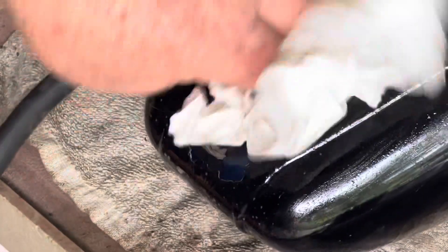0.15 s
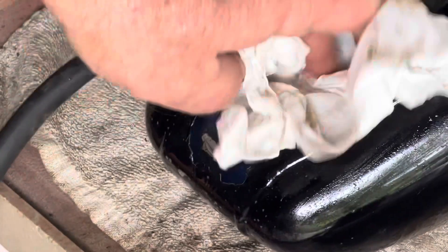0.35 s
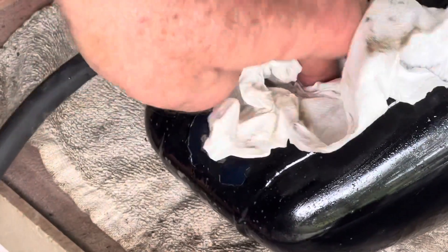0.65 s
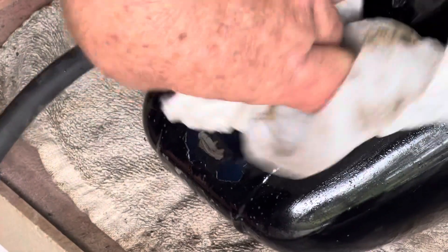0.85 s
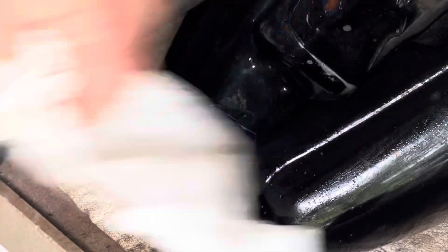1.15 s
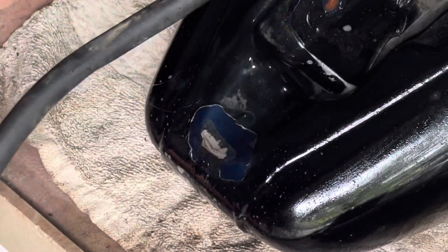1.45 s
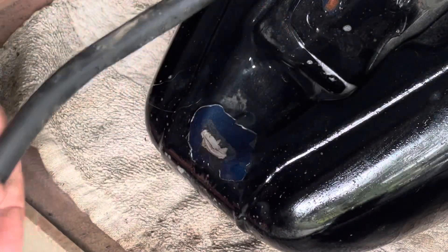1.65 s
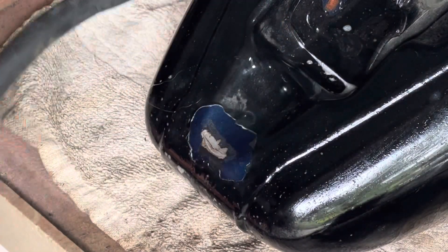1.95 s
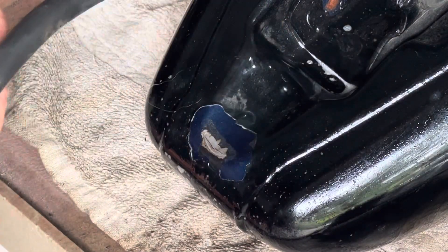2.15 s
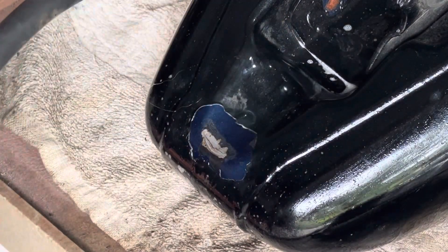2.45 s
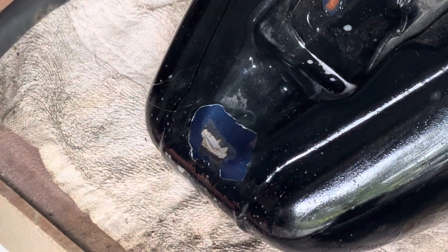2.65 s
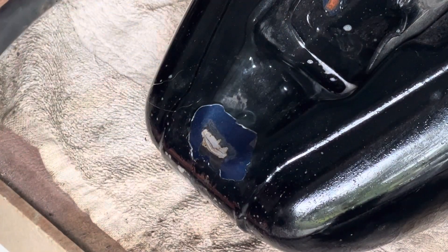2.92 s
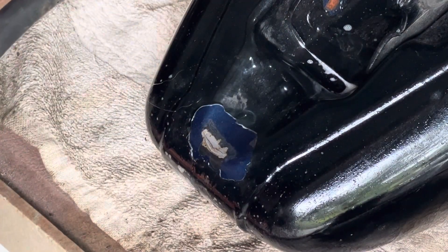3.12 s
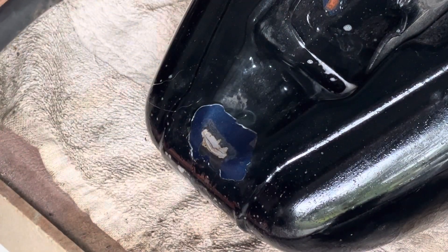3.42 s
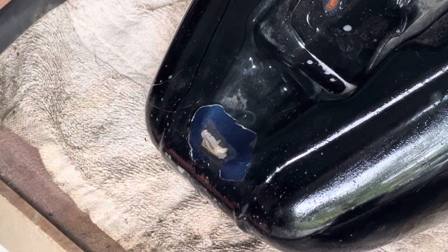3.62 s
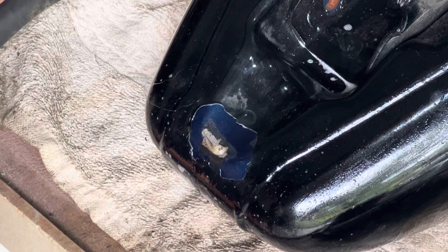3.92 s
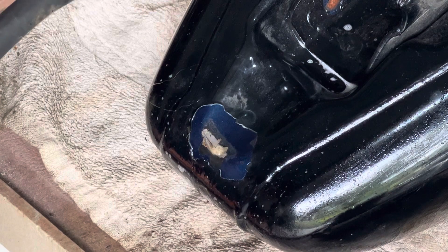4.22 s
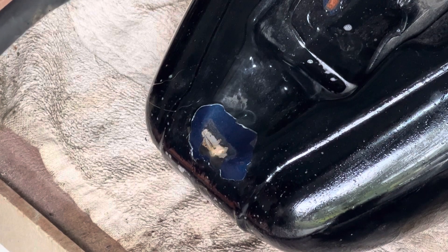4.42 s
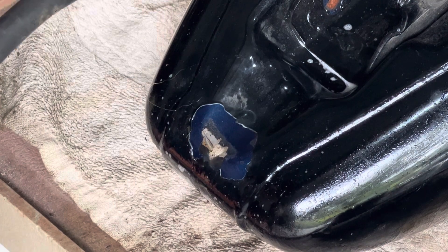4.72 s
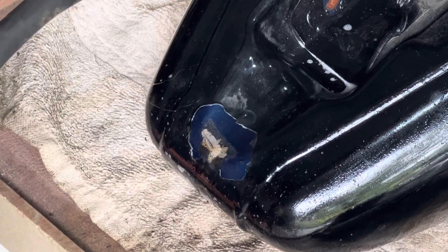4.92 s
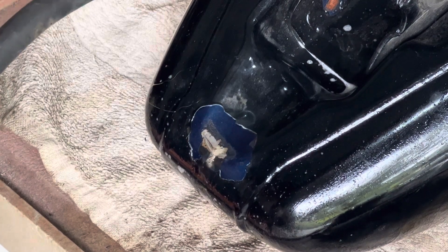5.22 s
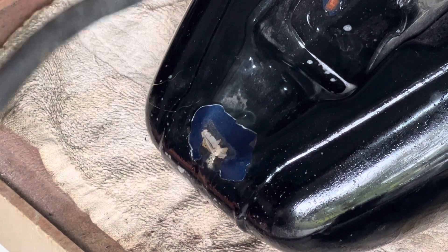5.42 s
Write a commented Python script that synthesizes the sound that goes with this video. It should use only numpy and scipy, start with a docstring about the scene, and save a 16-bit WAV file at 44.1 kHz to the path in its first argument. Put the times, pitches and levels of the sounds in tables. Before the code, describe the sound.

In a reverberant workshop, a thin air leak hisses steadily over low rumble. Close by, a paper towel rustles and a hand bumps and drags on a hollow metal tank for about a second and a half. After a quiet wait, three short, very loud air gun blasts roar into the tank, each fading into the room. A hose knocks at the very end. Close phone pickup in stereo.

```python
"""First a leaking air line hisses over workshop rumble, as a paper towel rubs a metal tank and a hand bumps it.
Then three air gun blasts roar into the tank and die away in the workshop; at the end the hose knocks.
Air is filtered noise, blows are short forces ringing damped modes, and the room is decaying noise.
Place: a workshop. Distance: close by, sources in the centre. Microphone: a phone with two ports."""
import sys
import numpy as np
from scipy import signal
from scipy.fft import rfft, irfft
from scipy.io import wavfile

SR = 44100
rng = np.random.default_rng(int(sys.argv[2]) if len(sys.argv) > 2 else 0)


def waveform_to_disk(signal):
    """Save audio, clipped to [-1, 1], as 16-bit WAV at the path in sys.argv[1]."""
    frames = np.transpose(np.atleast_2d(signal))
    scaled = np.clip(frames, -1, 1) * 32767
    samples = np.round(scaled).astype(np.int16)
    wavfile.write(sys.argv[1], SR, samples)


N = 245634  # samples
TIME = np.arange(N) / SR  # s
FREQ = np.maximum(np.arange(N // 2 + 1) * SR / N, 1)  # Hz


def undb(db):
    """Decibels to amplitude gain."""
    return 10 ** (np.asarray(db) / 20)


def gains(spectrum):
    """Gain at every frequency, drawn through (f/Hz, level/dB) points on a log frequency axis."""
    hz, db = np.transpose(spectrum)
    return undb(np.interp(np.log(FREQ), np.log(hz), db))


def shape(x, response):
    """Filter by a frequency response."""
    return irfft(rfft(x) * response, N)


def noise(spectrum):
    """Random noise with the given power per Hz."""
    return shape(rng.standard_normal(N), gains(spectrum)) * np.sqrt(SR / 2)


def walk(rate_hz):
    """Smooth random curve with mean 0 and spread 1; a higher rate wanders faster."""
    curve = shape(rng.standard_normal(N), np.exp(-(FREQ / rate_hz) ** 2))
    return (curve - curve.mean()) / curve.std()


def split(x, centres):
    """Overlapping bands that add up to the whole."""
    log_centres = np.log(centres)
    return [shape(x, np.interp(np.log(FREQ), log_centres, pick)) for pick in np.eye(len(centres))]


def turbulent(x, depth_db, rate_hz):
    """Eddies make the bands flicker, partly together and partly alone."""
    shared = walk(rate_hz)
    total = 0
    for band in split(x, np.geomspace(400, 12000, num=6)):
        flicker = walk(rate_hz) + shared / 2
        total = total + band * undb(depth_db * flicker)
    return total


def resonance(hz, width_hz):
    """Band-pass response of one resonance, with gain 1 at the centre."""
    return 1 / (1 + 1j * (FREQ / hz - hz / FREQ) * hz / width_hz)


def narrow_noise(hz, width_hz):
    """Noise through one resonance applied twice for steeper sides, rms 1."""
    x = shape(rng.standard_normal(N), resonance(hz, width_hz) ** 2)
    return x / x.std()


# air line leak, colour of the hiss before its level is set: f/Hz, level/dB per Hz
LEAK_COLOUR = [(500, -120), (1400, -116), (1900, -109), (2500, -100), (4000, -93), (5000, -92), (5800, -88),
               (7400, -93.5), (8200, -99), (8900, -102), (9800, -119), (12000, -120), (15000, -137)]
# the leak swells and sinks in a slow, even cycle
LEAK_DB, SWELL_DB, SWELL_PERIOD_S, SWELL_CREST_S = -55, 1.14, 1.204, 0.73


def leak():
    """Air escaping through a small gap: a thin, steady hiss that slowly swells and sinks."""
    swell = SWELL_DB * np.cos(2 * np.pi * (TIME - SWELL_CREST_S) / SWELL_PERIOD_S)
    hiss = turbulent(noise(LEAK_COLOUR), depth_db=0.5, rate_hz=13)
    return hiss / hiss.std() * undb(LEAK_DB + swell)


# workshop rumble, before its wander: f/Hz, level/dB per Hz
RUMBLE_COLOUR = [(20, -104), (40, -106), (60, -87.5), (100, -92), (180, -93.5), (300, -100.5), (600, -105),
                 (1300, -115), (3000, -130)]


def workshop_rumble():
    """Low, broad noise of the place, whose level wanders slowly."""
    return noise(RUMBLE_COLOUR) * undb(1.3 * walk(rate_hz=2.4))


# workshop reverberation: f/Hz, t60/s, level/dB
WORKSHOP_DECAY = [(100, 1.04, -5), (300, 0.85, -9), (742, 1.16, -11.5), (1495, 0.78, -8), (2470, 0.74, -10),
                  (4940, 0.78, -8.5), (7260, 0.73, -4), (11300, 0.6, -6), (16000, 0.41, -8)]


def room_tail(x, build_s=0.0082):
    """Dense reflections that build up quickly and die sooner in the high treble."""
    bands = split(rng.standard_normal(N), [row[0] for row in WORKSHOP_DECAY])
    response = 0
    for band, (_, t60, db) in zip(bands, WORKSHOP_DECAY):
        decay = np.log(1000) / t60
        # the root evens out the energy of short and long tails
        response = response + band * np.exp(-decay * TIME) * undb(db) * np.sqrt(2 * decay / SR)
    return signal.fftconvolve(x, response * (1 - np.exp(-TIME / build_s)))[:N]


# paper rubbing on metal, before stroke and crinkle: f/Hz, level/dB per Hz
PAPER_COLOUR = [(150, -102), (500, -99), (1300, -103), (3000, -102), (6000, -102), (10000, -117),
                (16000, -117)]
# paper towel strokes: centre t/s, half length t/s, level/dB
TOWEL_STROKES = [(0.2, 0.1, -0.5), (0.873, 0.06, -14), (1.21, 0.015, -5), (1.385, 0.051, -3)]
# the towel rustles faintly until it is lifted away
RUSTLE_DB, LIFTED_S, LIFT_S = -9.5, 1.42, 0.062


def towel(crinkle_db=3.0):
    """Soft paper rustles while it is held, and rubs with each stroke; fast level wander is the crinkle."""
    held = undb(RUSTLE_DB) * (1 - np.tanh((TIME - LIFTED_S) / LIFT_S)) / 2
    strokes = 0
    for centre, half, db in TOWEL_STROKES:
        strokes = strokes + undb(db) * np.exp(-((TIME - centre) / half) ** 2 / 2)
    return noise(PAPER_COLOUR) * (held + strokes) * undb(crinkle_db * walk(rate_hz=200))


def struck(blows, modes, scuff_s, thud_hz, thud_db, thud_t60, spot_db=2.5, choke_s=0.008):
    """Each blow is a short push and a fading scuff; softer contact rings mainly the low modes."""
    ring, dull, age = np.zeros(N + SR), np.zeros(N + SR), TIME[:SR // 2]
    hz, mode_db, t60 = np.transpose(modes)
    tones = np.cos(2 * np.pi * hz[:, None] * age)
    # crowded, well damped modes merge into a thud
    crowd = shape(rng.standard_normal(N), resonance(thud_hz, 2.2 * thud_hz) ** 2)
    thud = undb(thud_db) * np.exp(-np.log(1000) * age / thud_t60) / crowd.std()
    for start, db, contact_ms, scuff_db, free in sorted(blows):
        first = int(start * SR)
        span = slice(first, first + len(age))
        # whatever stays in contact damps its own ring and chokes the earlier ones
        rings = tones * np.exp(-np.log(1000) * age / (free * t60[:, None]))
        ring[span] *= free + (1 - free) * np.exp(-age / choke_s)
        # the push peaks a quarter of the contact time in
        push = age * np.exp(-age / (contact_ms / 4000))
        scuff = rng.standard_normal(len(age)) * np.exp(-age / scuff_s)
        force = undb(db) * (push / push.sum() + undb(scuff_db) * scuff / np.linalg.norm(scuff))
        # every blow lands on another spot and weights the modes anew
        weights = undb(mode_db + spot_db * rng.standard_normal(len(hz)))
        ring[span] += signal.fftconvolve(force, weights @ rings)[:len(age)]
        crowd_cut = np.roll(crowd, rng.integers(N))[:len(age)]
        dull[span] += signal.fftconvolve(force, thud * crowd_cut)[:len(age)]
    return (ring + dull)[:N]


# hand against the tank: t/s, first touch level/dB, its contact time/ms, weight of the hand level/dB, grip 0-1
HAND_TOUCHES = [(.156, -57.5, 0.65, -60, 0.45), (.196, -58.5, 1.1, -54, .6), (0.258, -52, 0.97, -44, 0.34),
                (.346, -49, 0.14, -37, .04), (.384, -57, 1.2, -43, .05), (.462, -56.5, 0.47, -54, 0.6),
                (.838, -57.5, 0.97, -52, 0.51), (.872, -61.5, 1.9, -54, 0.4)]
# the soft weight of the hand lands just after the first touch
WEIGHT_LAG_S, PALM_CONTACT_MS, PALM_SCUFF_DB = 0.01, 3, -20.5
GRIP_SCUFF_DB = 5  # scuff of a first touch at full grip, relative to its push


def bumps():
    """Each bump is a light touch, then the hand's weight; a firmer grip scuffs more and damps the ring."""
    blows = []
    for start, touch_db, contact_ms, weight_db, grip in HAND_TOUCHES:
        grip = np.clip(grip, .01, .9)
        scuff_db = GRIP_SCUFF_DB + 20 * np.log10(grip)
        blows.append((start, touch_db, contact_ms, scuff_db, 1 - grip))
        blows.append((start + WEIGHT_LAG_S, weight_db, PALM_CONTACT_MS, PALM_SCUFF_DB, 1 - grip))
    return blows


# the hand then drags over the wall in small, uneven jerks
DRAG_START_S, JERK_GAP_S, JERK_SCATTER_S = 0.57, 0.045, 0.0073
JERK_DB, JERK_CONTACT_MS, DRAG_GRIP = -55, 4.7, 0.35  # level before scatter


def jerks(count, scatter_db=3.5):
    """The dragging hand sticks and slips; every slip is a soft, faint blow."""
    blows = []
    for k, (late, strong) in enumerate(rng.standard_normal((count, 2))):
        start = DRAG_START_S + k * JERK_GAP_S + JERK_SCATTER_S * late
        db = JERK_DB + scatter_db * strong
        blows.append((start, db, JERK_CONTACT_MS, PALM_SCUFF_DB, 1 - DRAG_GRIP))
    return blows


# tank wall modes, ringing free: f/Hz, level/dB, t60/s
WALL_MODES = [(93, -5, 0.36), (116.4, 0, 0.21), (145.6, -4, 0.22), (279.6, -6, 0.43), (333, -1, 0.3),
              (507, -5, 0.22), (650, -2.5, 0.15), (790, -14, .25), (970, -3, 0.25), (1060, -10, 0.17),
              (1410, -20, .08), (2060, -4, 0.026)]


def hand_on_tank():
    """Bumps and drag jerks of the hand ring the damped modes of the tank wall."""
    blows = bumps() + jerks(count=6)
    return struck(blows, WALL_MODES, scuff_s=0.039, thud_hz=530, thud_db=1.5, thud_t60=0.074)


# air gun: trigger pressed t/s, full flow t/s, trigger released t/s,
# valve hiss level/dB, roar level/dB at full flow, roar swell/dB per s
GUN_BLASTS = [(3.378, 3.423, 3.547, 1.5, 2.5, -12.5), (4.043, 4.097, 4.2475, 1.5, -2.5, 20.5),
              (4.733, 4.779, 4.928, 3, -1.97, 20)]
# air squeezing through the valve, before each blast's level: f/Hz, level/dB per Hz
VALVE_COLOUR = [(200, -86.5), (1000, -80), (1900, -69.5), (3000, -71.5), (3800, -73), (4700, -60.5),
                (5400, -63), (7200, -62.5), (7900, -59), (8600, -58), (9400, -61), (12200, -59.5),
                (16000, -63.5)]
# the full jet striking the tank, before each blast's level: f/Hz, level/dB per Hz
ROAR_COLOUR = [(30, -74), (120, -76), (270, -69.5), (450, -66.5), (750, -62), (1350, -63.5), (2400, -56),
               (3400, -61.5), (4500, -56), (5900, -57.5), (7600, -62.5), (10300, -72.5), (12200, -59.5),
               (15700, -61)]


def air_gun(open_s=0.025, build_s=0.0051, close_s=0.0093, whistle_hz=4700, whistle_db=-33,
            boom_db=-50, boom_hz=50, boom_rise_s=0.14, boom_s=0.15):
    """The valve whistles and hisses as it cracks open; then the full jet roars in the tank over a low boom."""
    valve, seat, jet, boom = 0, 0, 0, 0
    for press, full, release, hiss_db, roar_db, swell_db in GUN_BLASTS:
        held, after = np.maximum(TIME - press, 0), np.maximum(TIME - release, 0)
        shut = np.exp(-after / close_s)
        opening = 1 - np.exp(-(held / open_s) ** 1.75)
        flow = (1 + np.tanh((TIME - full) / (2 * build_s))) / 2
        valve = valve + undb(hiss_db) * opening * shut
        # only a narrow gap whistles
        seat = seat + 4 * opening * (1 - opening) * (1 - flow)
        swell = swell_db * (np.clip(TIME, full, release) - full)
        jet = jet + undb(roar_db + swell) * flow * shut
        boom_rise = 1 - np.exp(-np.maximum(TIME - full, 0) / boom_rise_s)
        boom = boom + boom_rise * np.exp(-after / boom_s)
    hiss = valve * noise(VALVE_COLOUR)
    roar = jet * turbulent(noise(ROAR_COLOUR), depth_db=1.26, rate_hz=40)
    whistle = undb(whistle_db) * seat * narrow_noise(whistle_hz, width_hz=440)
    low_boom = undb(boom_db) * boom * narrow_noise(boom_hz, width_hz=27)
    return hiss + roar + whistle + low_boom


# air resonances of the tank: f/Hz, width/Hz, gain level/dB
TANK_RESONANCES = [(405, 22, 1), (652, 27, -2), (968, 15, 7.5), (1114, 16, -2.5), (1847, 11.4, 7.5),
                   (2140, 41.75, -9), (2270, 9.8, -2), (4420, 16, -5), (4430, 21, -1), (5320, 29.917, 0.5),
                   (5900, 27, -8), (7120, 21, -10), (8704, 26, -23)]


def tank_air(jet):
    """The air inside the tank rings with the jet in narrow resonances."""
    return shape(jet, sum(undb(db) * resonance(hz, width) for hz, width, db in TANK_RESONANCES))


# hose knocks: t/s, level/dB, contact time/ms, scuff level/dB relative to the push, share of the free ring time
HOSE_KNOCKS = [(5.509, -47, 0.43, -11, .6), (5.515, -36, 0.65, -19, 1), (5.535, -41, 0.95, -13, 1)]
# modes of what the hose strikes, ringing free: f/Hz, level/dB, t60/s
CLUNK_MODES = [(267, -6, 0.34), (342, -10, 0.15), (553, 1, 0.15), (690, -4, 0.15), (885, -0.5, 0.2),
               (950, -5, 0.18), (1000, -12, 0.2), (1310, -20, .08), (1500, -27, .08), (2100, -15, .04),
               (2450, -12, .03)]


def hose():
    """The hose, pulled back, knocks and rings the damped modes of what it strikes."""
    return struck(HOSE_KNOCKS, CLUNK_MODES, scuff_s=0.043, thud_hz=760, thud_db=3.0, thud_t60=0.072)


# stereo width of the sound, level of the left-right difference by frequency: f/Hz, level/dB
STEREO_WIDTH = [(60, -19), (300, -8), (1300, -2.5), (1900, -10.5), (2300, -38.5), (3000, -1.5),
                (4500, -14.5), (5500, -62), (8200, -55), (9300, -7.5), (12000, -35.5), (14000, -10.5),
                (16000, -9)]


def scene(bounce_ms=1.9, bounce_db=-10):
    """All sources sit in the centre; a bounce off the tank and the room spread them left and right."""
    air = air_gun()
    near = leak() + workshop_rumble() + towel() + hand_on_tank() + air + hose()
    # a phase slope delays the bounce
    bounce = undb(bounce_db) * shape(near, np.exp(-2j * np.pi * FREQ * bounce_ms / 1000))
    # the ring of the tank air is heard close by only, without the room
    mid = near + tank_air(air) + room_tail(near)
    side = shape(bounce + room_tail(near), gains(STEREO_WIDTH))
    return np.array([mid + side, mid - side])


# phase by which the left port leads, winding round twice in the top treble: f/Hz, phase/rad
PORT_LEAD = [(0, 0), (8750, 0), (9250, 1.7), (9750, 2.9), (10500, 3.4), (11000, 4.5), (11850, 6.2),
             (12350, 6.35), (13200, 8.3), (13550, 9.2), (14250, 9.8), (14750, 11.1), (15250, 12.57)]
TOP_HZ = 15850


def record(dry, low_cut_hz=35):
    """The two ports fall out of phase in the top treble; the phone cuts the deepest bass and the very top."""
    lead = np.interp(FREQ, *np.transpose(PORT_LEAD))
    ports = shape(dry, np.exp(1j * np.array([lead, -lead]) / 2))
    low_cut = signal.butter(4, low_cut_hz, "high", fs=SR, output="sos")
    top_cut = signal.ellip(12, .1, 90, TOP_HZ, fs=SR, output="sos")  # ripple dB, stop band dB
    return signal.sosfilt(top_cut, signal.sosfilt(low_cut, ports))


dry = scene()
out = record(dry)
waveform_to_disk(out)
```